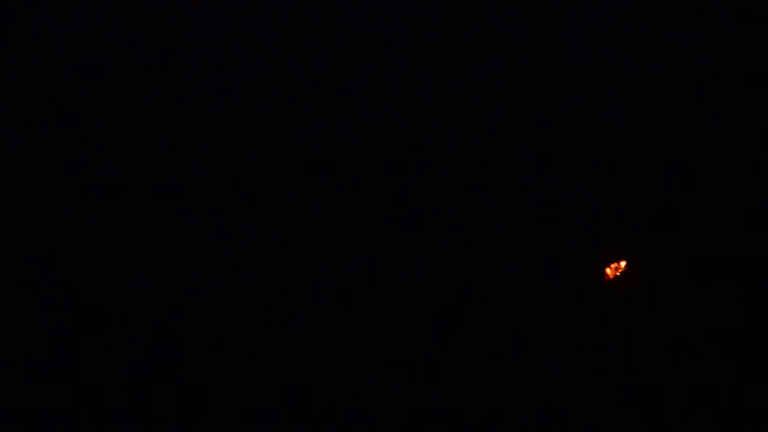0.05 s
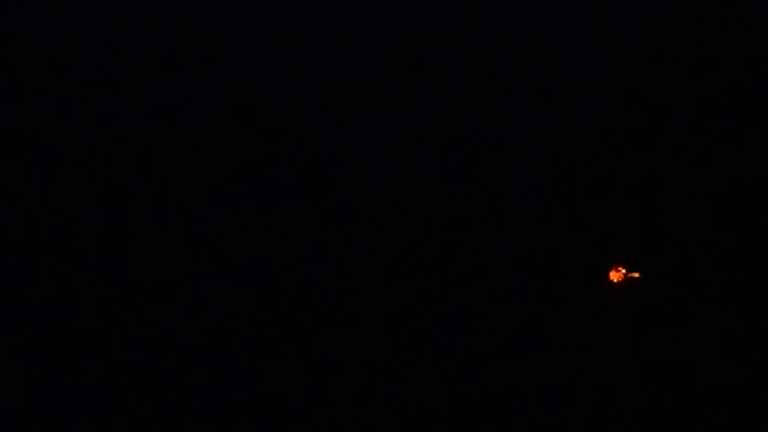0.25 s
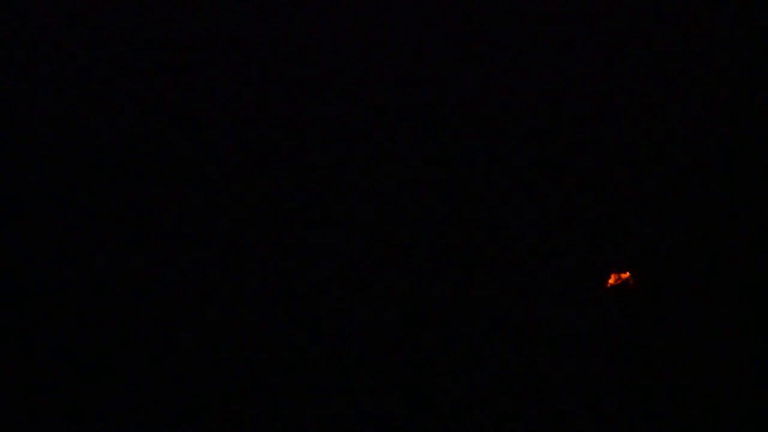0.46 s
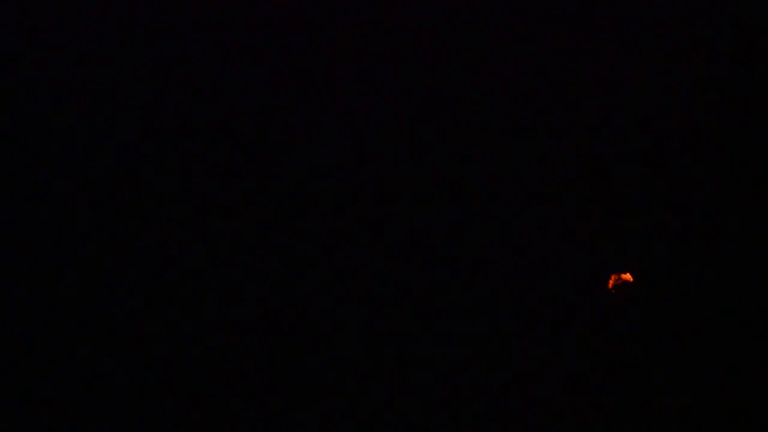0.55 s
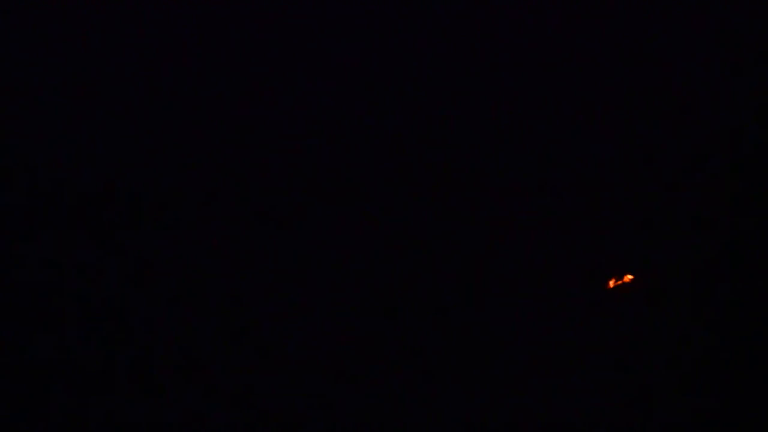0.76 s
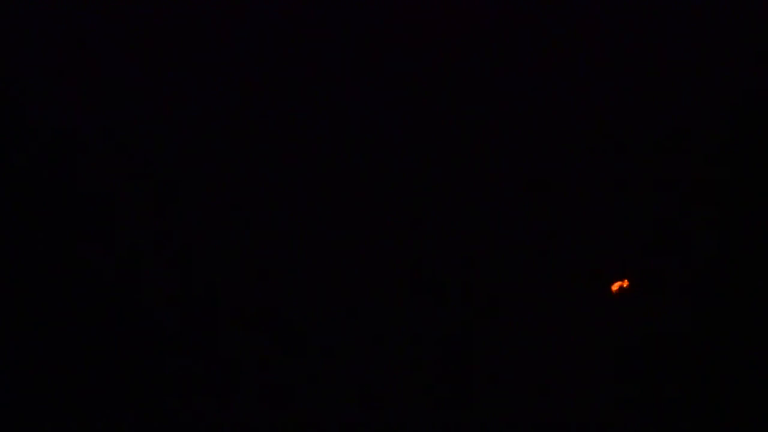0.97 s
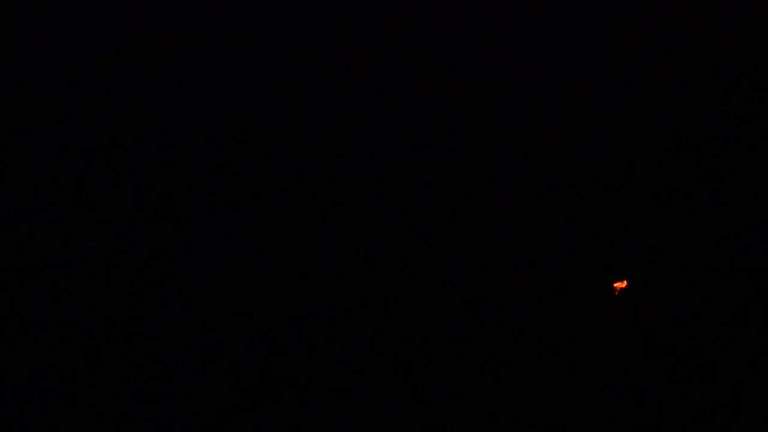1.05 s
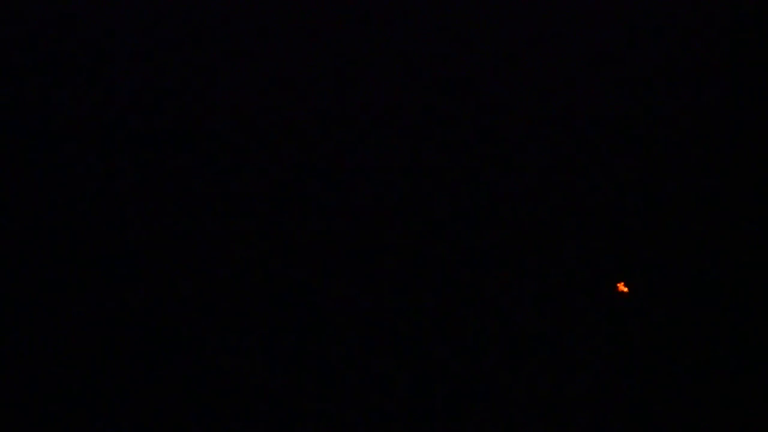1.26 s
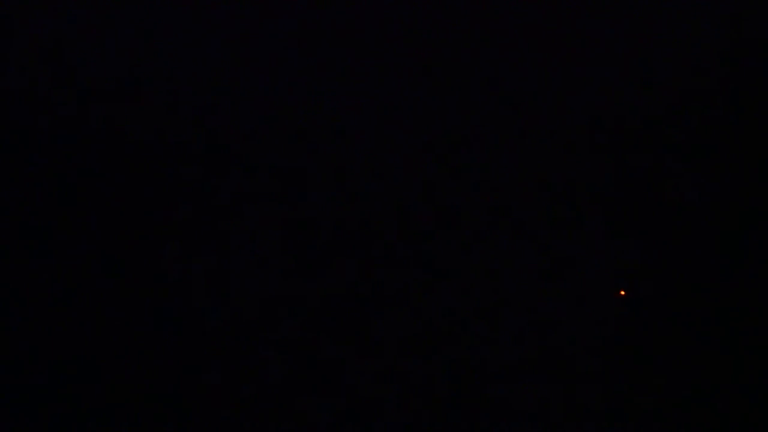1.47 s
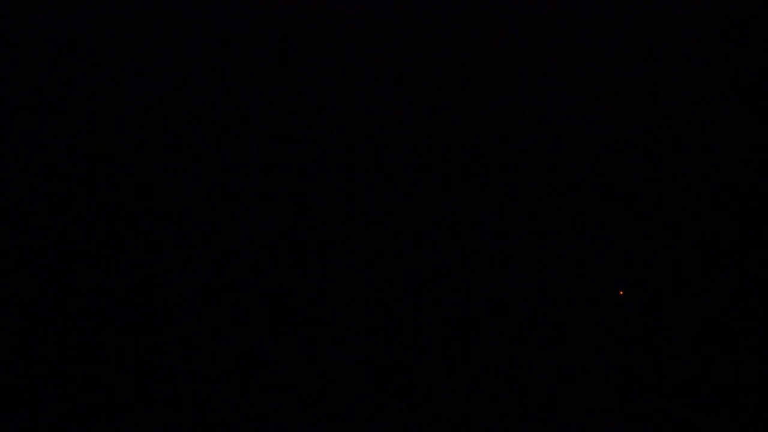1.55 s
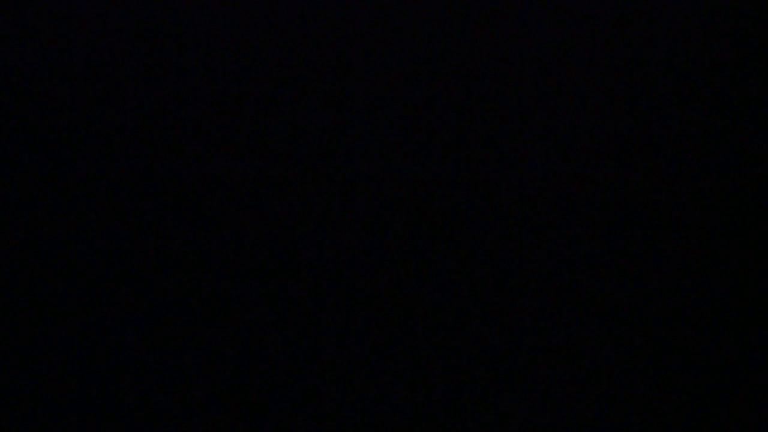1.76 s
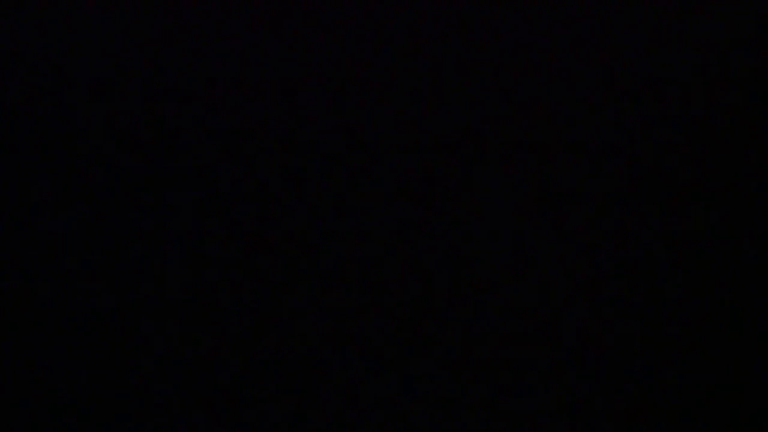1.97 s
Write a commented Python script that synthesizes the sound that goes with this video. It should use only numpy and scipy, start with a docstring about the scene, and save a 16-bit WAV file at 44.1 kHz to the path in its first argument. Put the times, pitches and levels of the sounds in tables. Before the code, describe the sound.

Tiny dry crackles and a sharp snap from a dying paper ember, close up.

```python
"""A small, quiet room, with one microphone close to a smouldering scrap of paper.
Behind the paper lie hiss, the soft whirr of a fan, mains hum and a thin electrical whistle.
The glowing edge sizzles, and charring fibres break in flurries of tiny fractures, in single ticks
and in one sharp snap. The sheet knocks softly as it shifts and gives a few duller pops;
then the ember dies down."""
import sys
import numpy as np
from scipy import signal
from scipy.fft import rfft, irfft
from scipy.io import wavfile

SR = 44100
rng = np.random.default_rng(int(sys.argv[2]) if len(sys.argv) > 2 else 0)


def put_to_file(sound):
    """Save the sound as 16-bit audio at rate SR, in the file named by the first command-line argument."""
    columns = np.atleast_2d(sound).T  # one column per channel
    safe = np.clip(columns, -1, 1)
    whole_steps = np.round(safe * 32767)
    wavfile.write(sys.argv[1], SR, whole_steps.astype(np.int16))


N = 88200


def from_db(db):
    """Decibels to gain."""
    return 10 ** (np.asarray(db) / 20)


def rms_one(x):
    """Scale to rms 1."""
    return x / np.sqrt(np.mean(x ** 2) + 1e-20)


def gain_at(colour, hz):
    """Gain of an (f/Hz, level/dB) table on a log-frequency axis."""
    f, db = np.transpose(colour)
    return from_db(np.interp(np.log(hz + 1e-3), np.log(f), db))


def add(out, start, sound):
    """Mix a sound into out, start seconds in."""
    i = int(np.clip(start * SR, 0, N - 1))
    out[i:i + len(sound)] += sound[:N - i]


def noise(shape):
    """Noise of rms 1 whose spectrum is shape(Hz)."""
    white = rfft(rng.standard_normal(N))
    return rms_one(irfft(white * shape(np.fft.rfftfreq(N, 1 / SR)), N))


def resonance(hz, width_hz):
    """Noise in one steep-sided resonance."""
    return noise(lambda f: 1 / np.sqrt(1 + (2 * (f - hz) / width_hz) ** 4))


def click(colour, tilt_db=0, size=2048):
    """The shortest causal pulse with this colour, tilted by tilt_db per octave above 1 kHz; peak 1."""
    hz = np.fft.rfftfreq(size, 1 / SR)
    octaves = np.log2(np.maximum(hz / 1000, 1))
    spectrum = gain_at(colour, hz) * from_db(tilt_db * octaves)
    cepstrum = irfft(np.log(spectrum))
    cepstrum[1:size // 2] *= 2  # fold onto positive time: minimum phase
    cepstrum[size // 2 + 1:] = 0
    pulse = irfft(np.exp(rfft(cepstrum)))[:size // 2]
    return -pulse / np.abs(pulse).max()


# Spectrum of the room tone: f/Hz, relative level/dB
AIR_COLOUR = [(20, -12), (40, -8), (75, -2.5), (98, 2), (160, -1.5), (240, 0.5), (330, -1), (520, 1.5),
              (760, -2), (1250, 1.5), (1650, -4), (3000, -5), (5000, -8), (8000, -11.5), (11000, -11.5),
              (16000, -15)]
def air(rms_db=-60):
    """Steady air noise and hiss lie under everything."""
    return from_db(rms_db) * noise(lambda f: gain_at(AIR_COLOUR, f))


# Resonances of the fan in the background: f/Hz, width/Hz, rms level/dB
FAN_RESONANCES = [(926.5, 39, -70.5), (997, 67, -71), (1167, 83, -73.5), (1444, 91, -69.5),
                  (2754, 120, -74.5), (3843, 190, -70.5), (4550, 83, -83.5), (5460, 120, -77)]
def fan():
    """The fan whirrs: noise gathered in narrow resonances."""
    return sum(from_db(db) * resonance(hz, width_hz) for hz, width_hz, db in FAN_RESONANCES)


# Four mains harmonics and the whistle far above them: f/Hz, rms level/dB
ELECTRICAL_TONES = [(60, -78), (120, -78), (180, -82), (240, -82), (15682, -81)]
def hum_and_whistle(waver_depth=0.21, waver_width_hz=9.9, halo_width_hz=30, halo_db=-84):
    """Mains hum and an electrical whistle waver slightly; the whistle has a faint noisy halo."""
    t, out = np.arange(N) / SR, np.zeros(N)
    for hz, db in ELECTRICAL_TONES:
        waver = 1 + waver_depth * resonance(0, waver_width_hz)
        tone = np.sqrt(2) * np.sin(2 * np.pi * (hz * t + rng.random()))
        out += from_db(db) * waver * tone
    whistle_hz = ELECTRICAL_TONES[-1][0]
    return out + from_db(halo_db) * resonance(whistle_hz, halo_width_hz)


# Spectrum of a fibre breaking, heard close up: f/Hz, relative level/dB
FIBRE_COLOUR = [(100, -27), (400, -15), (1200, -11), (1700, -6.5), (2900, -9), (4200, -2.5), (6200, -1),
                (7600, -1.5), (8900, -9.5), (9600, -5), (10600, -17), (12000, -13.5), (15500, -43)]
def fractures(per_s, spread_db, tilt_db=0, count=N):
    """Fibres break at random times, each a tiny click of uneven size; rms 1."""
    sizes = from_db(spread_db * np.minimum(rng.exponential(1, count), 3))
    signs = rng.choice([-1, 1], count)
    breaking = rng.random(count) < per_s / SR
    crackle = signal.fftconvolve(sizes * signs * breaking, click(FIBRE_COLOUR, tilt_db))
    return rms_one(crackle[:count])


# Rise and fall of the ember's sizzle: t/s, rms level/dB
SIZZLE_LEVELS = [(0, -55), (.1, -77), (.2, -61), (.275, -64), (.36, -55), (.6, -64), (.72, -72.5),
                 (.9, -70.5), (1.05, -58.5), (1.14, -72.5), (1.35, -68.5), (1.65, -73.5), (2, -77)]
def sizzle():
    """The glowing edge keeps up a faint crackle."""
    level_db = np.interp(np.arange(N) / SR, *np.transpose(SIZZLE_LEVELS))
    return from_db(level_db) * fractures(per_s=1200, spread_db=3.5)


# Cracks in the char: t/s, length/s, rms level/dB, treble tilt/(dB per octave)
CRACK_RUNS = [(.001, 0.01, -54, -1), (0.03, .008, -44, -1), (0.041, .005, -52.5, 0.5),
              (0.151, .017, -61, 1), (0.167, 0.0094, -53.5, 0), (0.2, 0.014, -56.5, -4),
              (0.2211, .004, -44, 1.5), (0.232, 0.013, -51.5, 0.5), (0.246, 0.0053, -47.5, 2),
              (0.3008, 0.017, -46.5, 0.5), (0.326, 0.031, -51.5, -1.5), (0.337, 0.0058, -44.5, 1),
              (0.393, 0.043, -49, -1), (0.438, 0.043, -57.5, -2), (0.525, .009, -45.5, -1),
              (0.556, 0.014, -53.5, 3), (0.572, 0.0034, -38.5, 2.5), (0.584, 0.011, -57, 1),
              (0.6217, 0.0012, -44, 5), (.952, .003, -53.5, -1), (1.034, 0.027, -57, -1),
              (1.063, 0.0075, -52, 2), (1.075, .014, -54, 0.5), (1.226, 0.0035, -52.5, 4),
              (1.261, 0.022, -63, 5), (1.343, 0.0022, -50, 3), (1.358, .016, -63, 6),
              (1.536, 0.017, -59, -3)]
def flurries(attack_s=0.00041, release_s=0.0017):
    """A crack runs through the char: the fractures start quickly, hold and stop."""
    t, out = np.arange(SR // 10) / SR, np.zeros(N)
    for start, length, db, tilt_db in CRACK_RUNS:
        attack = np.minimum(t / attack_s, 1)
        release = np.exp(-np.maximum(t - length, 0) / release_s)
        envelope = attack * release
        run = envelope * fractures(per_s=3500, spread_db=2, tilt_db=tilt_db, count=len(t))
        envelope_rms = np.sqrt(np.mean(envelope ** 2))
        add(out, start, from_db(db) * envelope_rms * rms_one(run))
    return out


# Single fibres close to the microphone: t/s, peak level/dB, treble tilt/(dB per octave)
FIBRE_BREAKS = [(.016, -32.5, -2.5), (0.0279, -36, 0), (.0353, -39, -2.5), (0.1779, -33.5, -1),
                (.1835, -35, -0.5), (0.2147, -34, -2), (0.2224, -39, -2), (.2384, -36, 0), (.2458, -33, 1),
                (0.3048, -31, -1.5), (.3074, -33, 1.5), (0.3148, -39, 2), (0.3339, -34, -2),
                (0.3396, -33.5, -3), (.355, -36, -4), (0.4235, -26.5, -1), (.4277, -32, 0),
                (.4328, -28.5, -1.5), (0.4605, -36, -1), (.4759, -45, 4), (0.5333, -38, 1),
                (0.5558, -32, 1), (0.5602, -33, -2), (.5746, -28, 4), (0.6093, -35, 0), (0.6162, -38, 4),
                (0.6327, -29, 0.5), (.9725, -40.5, 0), (1.014, -37, -2), (1.024, -31.5, 4),
                (1.035, -37, -2), (1.066, -40, -1), (1.0722, -32.5, 0), (1.0775, -28.5, 1.5),
                (1.079, -32.5, 1), (1.087, -34, -3), (1.1593, -44, 0), (1.1982, -40, 3), (1.2281, -32.5, 0),
                (1.3457, -28.5, 3), (1.3627, -42.5, 4), (1.37, -41, 4), (1.4437, -42.5, -1),
                (1.5457, -38.5, -1), (1.5878, -35.5, 3.5)]
def ticks():
    """One charring fibre breaks with one click."""
    out = np.zeros(N)
    for start, db, tilt_db in FIBRE_BREAKS:
        add(out, start, from_db(db) * click(FIBRE_COLOUR, tilt_db))
    return out


# Shifts of the sheet: t/s, peak level/dB, f/Hz, T60/s
SHEET_KNOCKS = [(.031, -47.5, 764, 0.03), (0.624, -43, 430, 0.0085)]
def knocks():
    """The sheet shifts with a soft hollow knock: one quickly dying low mode."""
    t, out = np.arange(SR // 10) / SR, np.zeros(N)
    for start, db, hz, t60 in SHEET_KNOCKS:
        decay = 1e-3 ** (t / t60)
        add(out, start, from_db(db) * decay * np.sin(2 * np.pi * hz * t))
    return out


# Spectrum of the snap, heard close up: f/Hz, relative level/dB
SNAP_SPECTRUM = [(100, -42), (300, -23), (950, -11), (1220, -15), (1500, -5.5), (2700, -7.5), (4200, -1),
                 (6200, 1.5), (7600, -2), (9600, -9), (12000, -18), (15500, -42)]
def snap(start_s=0.3923, peak_db=-7):
    """One sharp break in the char, far louder than the rest."""
    out = np.zeros(N)
    add(out, start_s, from_db(peak_db) * click(SNAP_SPECTRUM))
    return out


# Spectrum of a pop: f/Hz, relative level/dB
POP_SPECTRUM = [(100, -26), (250, -18), (450, -9), (720, -6.5), (970, -0.5), (1200, -6), (1600, -1.5),
                (2700, -7), (6000, -2.5), (9000, -14.5), (15500, -28)]
# Pops of the sheet: t/s, peak level/dB
SHEET_POPS = [(0.6247, -30), (0.9502, -25.5), (1.0235, -31.5), (1.3134, -34.5)]
def pops():
    """The whole sheet pops, with a duller click than a single fibre makes."""
    out = np.zeros(N)
    for start, db in SHEET_POPS:
        add(out, start, from_db(db) * click(POP_SPECTRUM))
    return out


def room(x, echo_s=0.000913, echo_db=-17, tail_delay_s=0.004, tail_t60_s=0.32, tail_db=-13.5):
    """The microphone hears the direct sound, an echo off a surface close by and a short diffuse tail."""
    t = np.arange(SR // 2) / SR
    tail = rng.standard_normal(len(t)) * 1e-3 ** (t / tail_t60_s) * (t > tail_delay_s)
    response = from_db(tail_db) * tail / np.linalg.norm(tail)
    response[0] += 1  # direct sound
    response[int(echo_s * SR)] -= from_db(echo_db)
    return signal.fftconvolve(x, response)[:N]


def scene():
    """Paper up close, room tone behind; one microphone feeds both channels."""
    paper = room(flurries() + sizzle() + ticks() + knocks() + snap() + pops())
    room_tone = air() + fan() + hum_and_whistle()
    return np.tile(paper + room_tone, (2, 1))


def record(dry):
    """The treble is cut steeply above 16 kHz."""
    lowpass = signal.firwin(255, 16000, fs=SR)
    return signal.fftconvolve(dry, lowpass[None], "same", axes=1)


dry = scene()
out = record(dry)
put_to_file(out)
```